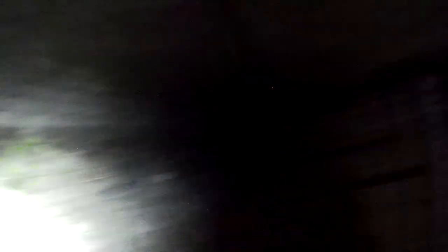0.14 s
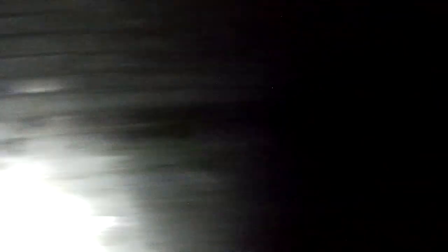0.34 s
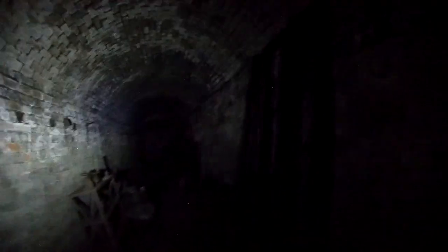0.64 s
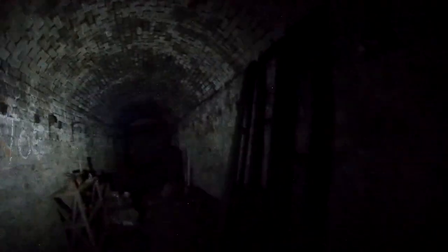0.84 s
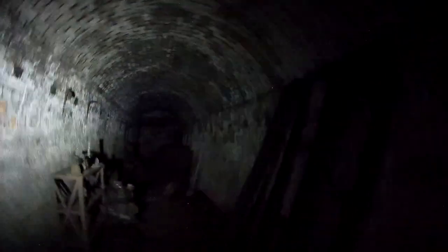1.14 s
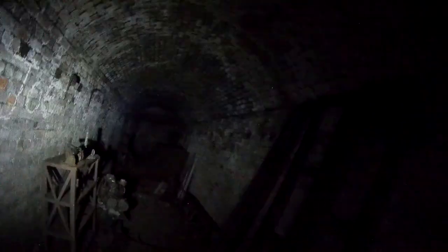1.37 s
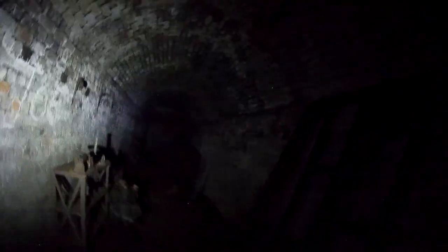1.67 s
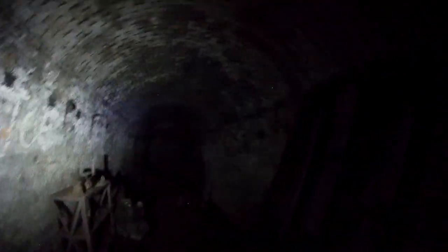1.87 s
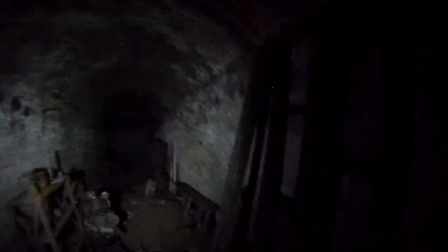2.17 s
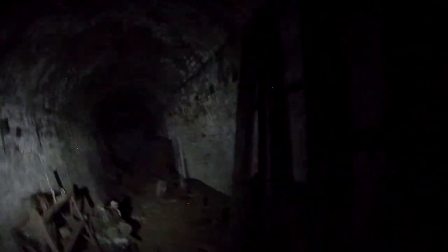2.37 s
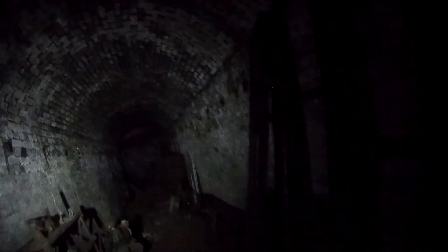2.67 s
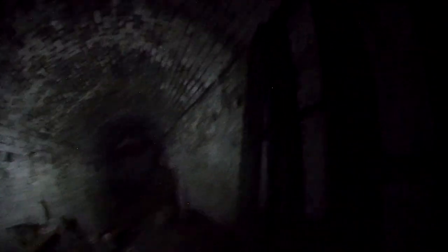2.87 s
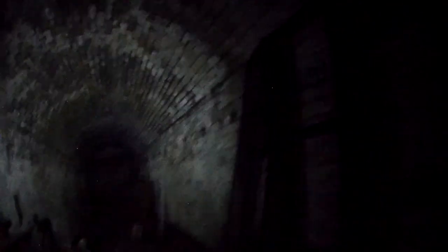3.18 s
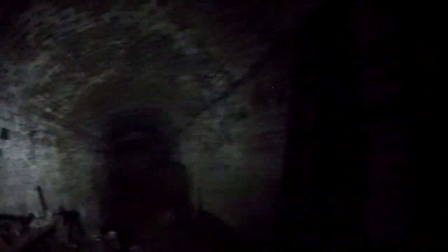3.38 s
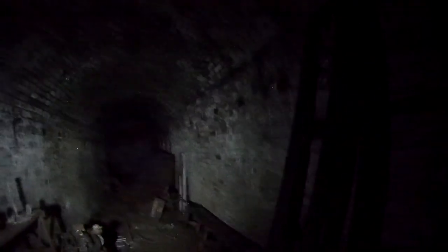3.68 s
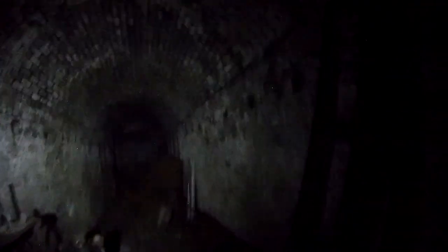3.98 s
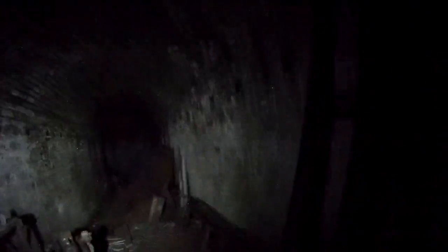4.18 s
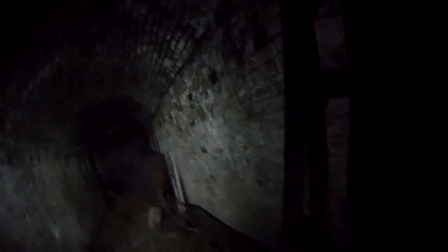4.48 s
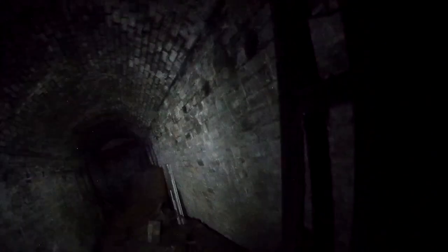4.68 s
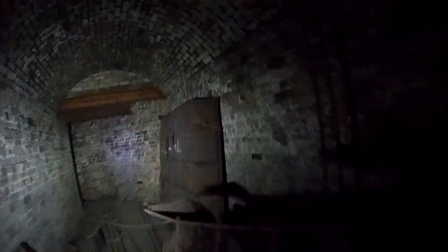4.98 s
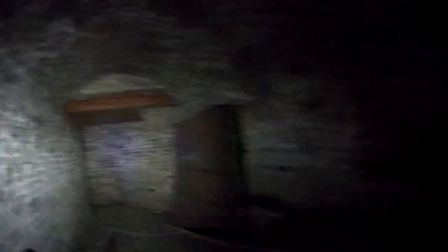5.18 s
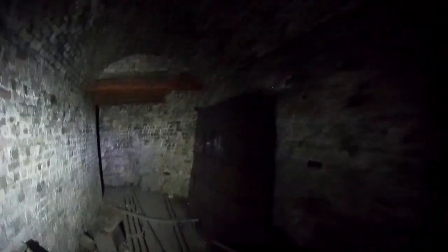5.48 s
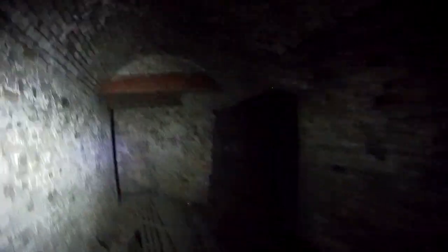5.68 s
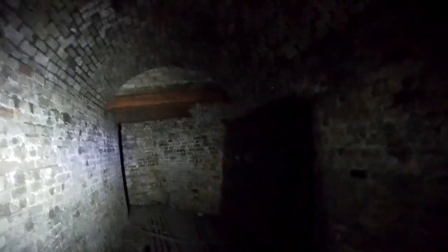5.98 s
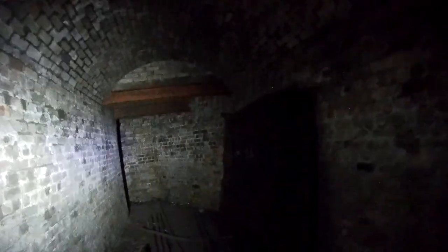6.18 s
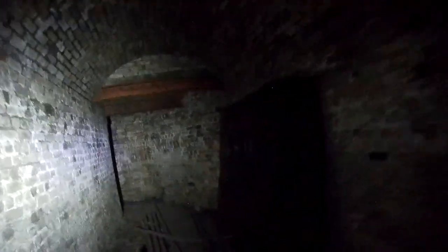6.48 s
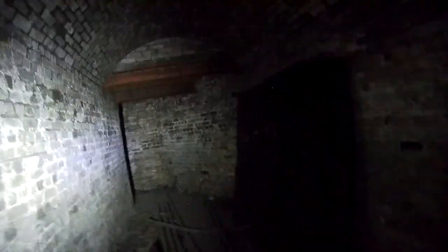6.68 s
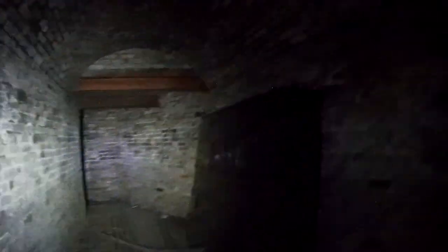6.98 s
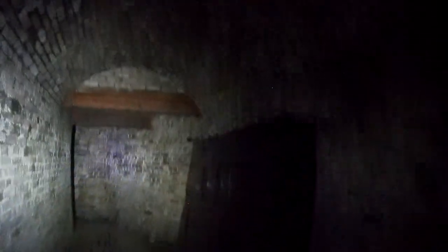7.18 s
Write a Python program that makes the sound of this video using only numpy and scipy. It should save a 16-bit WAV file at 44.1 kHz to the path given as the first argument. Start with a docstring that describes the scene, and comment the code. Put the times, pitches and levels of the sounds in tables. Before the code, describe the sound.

Someone walks unevenly over gritty rubble inside a reverberant brick tunnel. A cluster of crunching steps comes first, then a pause, then denser, louder stomps with sandy scrapes and a sharp stone crack. After a quiet gap a deep thud booms along the vault, followed by faint scuffs. Small debris clinks. A hand-held camera microphone adds dry handling ticks, low rumble and soft hiss.

```python
"""Steps over rubble in a brick tunnel

Contacts are gritty noise pulses, filtered as heel thump, sole slap and knock of the piece underfoot.
Soles scrape as filtered grain noise; loose debris clinks as decaying, phase-rattled sines.
Noise tails make the vault ring after each of these; a late thud swells into a low boom of drifting sines.
Short dry ticks and snaps (the hand-held camera's body, and a cracking stone at 3.57 s) are noise bursts
with a low bump, over steady low rumble, hiss and a thin whine."""
import sys
import numpy as np
from scipy import signal
from scipy.fft import rfft, irfft
from scipy.io import wavfile
from scipy.ndimage import uniform_filter1d, map_coordinates

SR = 44100
rng = np.random.default_rng(int(sys.argv[2]) if len(sys.argv) > 2 else 0)


def int16_out(signal):
    """Quantize to a 16-bit WAV file."""
    q = np.round(np.clip(np.atleast_2d(signal).T, -1, 1) * 32767)
    wavfile.write(sys.argv[1], SR, q.astype(np.int16))


N = 323694

# shoe contacts: t/s, base level/dB, heel bass weight/dB, slap level re base/dB, knock f/Hz
CONTACTS = [(0.496, -31, -11, -6.5, 1266), (0.699, -27, -18.5, -17, 977), (0.793, -26.5, -8, -36, 472),
            (0.852, -18, -20, -23, 484), (0.874, -13, -19.5, -21, 534), (0.924, -17.5, -13, -18.5, 548),
            (0.982, -24.5, -11, -37, 697), (1.045, -22.5, -19, -31, 396), (1.074, -27.5, -11, -12, 440),
            (1.867, -14.5, -15.5, -21.5, 316), (1.962, -16, -18.5, -22.5, 318),
            (2.003, -21, -18, -14.5, 439), (2.218, -23, -25, -28, 791), (2.667, -16.5, -14, -29, 572),
            (2.708, -22, -13, -12, 440), (2.802, -29.5, -17, -2, 1213), (2.824, -28, -7, -11.5, 322),
            (2.913, -15, -14.5, -23, 573), (3.003, -18.5, -14.5, -25, 343), (3.018, -22.5, -19, -19, 396),
            (3.099, -19, -16, -9, 870), (3.112, -16, -22.5, -12, 720), (3.189, -17.5, -10, -43, 704),
            (3.263, -13, -17.5, -19, 708), (3.46, -10.5, -16.5, -13, 726), (3.49, -9.5, -14.5, -18, 283),
            (3.51, -12, -17.5, -37, 785), (3.982, -31, -10, -32, 415), (4.208, -16.5, -23, -21, 706),
            (4.261, -6.5, -14.5, -27, 473), (4.298, -10, -20, -24, 417), (4.335, -9, -19.5, -14.5, 564),
            (5.035, -35.5, -9, -37, 383), (5.142, -34.5, -24, -19, 630), (5.304, -33.5, -21, -14, 751),
            (5.34, -33.5, -23, -15, 1430), (5.634, -29.5, -6, -24, 388), (5.666, -20.5, -2.5, -17, 315),
            (5.682, -21.5, 1, -41, 375), (6.378, -35.5, -22, -13, 560), (6.418, -32, -22, -14.5, 636),
            (6.507, -26, -17, -17.5, 490), (6.569, -31.5, -13, -11.5, 1280), (6.628, -33.5, -12, -26, 480)]
# soles sliding on grit: t/s, base level/dB
SLIDES = [(0.699, -48.5), (0.876, -49), (0.9223, -44), (1.064, -45.5), (1.867, -46), (1.9605, -43),
          (2.6697, -52), (2.9077, -44.5), (3.112, -30), (3.457, -33.5), (3.4943, -32), (4.2599, -32.5),
          (4.3402, -40), (5.3064, -48), (5.347, -48), (5.6403, -43), (5.671, -47), (6.414, -51.5),
          (6.5654, -50)]
# short dry ticks and snaps, camera body and a cracking stone at 3.57 s: t/s, snap peak level/dB
TICKS = [(0.3353, -35), (0.392, -31), (1.1942, -23.5), (1.5129, -41.5), (3.5748, -18.5), (3.7369, -37)]
# loose debris ringing: t/s, f/Hz, level/dB, t60/s
DEBRIS = [(.51, 767, -42, 0.4), (.503, 1260, -37, 0.12), (2.218, 846, -39, .1), (4.22, 1150, -26, 0.15),
          (5.143, 625, -36.5, 0.18), (5.158, 1960, -44, 0.26), (5.162, 3600, -49.5, 0.064),
          (5.346, 1470, -41.5, 0.25), (5.368, 1452, -34.5, 0.089), (5.451, 1990, -44.5, .07),
          (5.46, 3480, -57, .12), (6.833, 656, -32, 0.035)]
# low cross modes of the vault: f/Hz, phase drift rate/Hz, base level/dB, swell/s, t60/s
BOOM_MODES = [(76, 11, -37, 0.015, 0.46), (122.5, 3, -33.5, 0.22, 0.94), (152, 24, -34.5, 0.042, 2.08),
              (184.7, 15.33, -35, 0.037, 1.84), (240, 79, -32.5, 0.032, 0.97), (320, 33, -41, 0.033, 0.68),
              (399, 50, -27, 0.0086, 0.26)]
# spectrum common to heel and sole: f/Hz, gain/dB
SHOE_SPECTRUM = [(60, -59.5), (105, -19), (150, -5.5), (205, -9.5), (265, -4), (430, 2.5), (750, -0.5),
                 (1100, -6), (1700, -15.5), (2200, -17.5), (2800, -32.5), (4000, -33.5), (9000, -59.5)]
# extra heel spectrum, soft heel damps the treble: f/Hz, gain/dB
HEEL_SPECTRUM = [(150, -2), (280, -0.5), (700, 0.5), (1000, -1.5), (1600, -7.5)]
# extra flat-sole spectrum, mostly treble: f/Hz, gain/dB
SLAP_SPECTRUM = [(400, -26), (800, -6.5), (1500, 4.5), (1900, 0), (2300, -2.5), (3100, 0.5), (4000, -2.5)]
# reach of the heel bass weight: f/Hz, share/1
THUMP_REACH = [(130, 0.34), (300, 0.88), (700, 0)]
# sand under a sliding sole: f/Hz, gain/dB
GRIT_SPECTRUM = [(400, -39), (1200, 9.5), (2500, -1), (4000, 0), (6500, -8.5), (8500, -15.5),
                 (15000, -21.5)]
# spectrum shared by ticks and snaps: f/Hz, gain/dB
SNAP_SPECTRUM = [(100, 9), (300, 8), (1400, 1), (1800, 9), (3000, 5.5), (4300, -10.5), (5200, -13),
                 (7500, -19.5), (15000, -46)]
# vault resonances: f/Hz, width/Hz, lift/dB
VAULT_RESONANCES = [(269.8, 6.8, 6.5), (306.7, 31, 7), (397.6, 6.1, 6), (582, 18, 0.5), (764, 14, 2.5),
                    (1120, 18, -4)]
# vault reverberation: f/Hz, t60/s
VAULT_DECAY = [(120, 1.6), (260, 0.78), (700, 0.69), (1200, 0.62), (2000, 0.5), (4800, 0.42), (12000, 0.2)]
# background spectrum, relative: f/Hz, density/dB per Hz
FLOOR_SPECTRUM = [(20, -3), (54, -2), (100, -5.5), (125, -12), (170, -6.5), (240, -11), (330, -15.5),
                  (450, -16), (750, -19.5), (1200, -23), (2000, -26.5), (5000, -30), (15500, -31)]

T = np.arange(SR) / SR  # s, span of one event
HZ = np.fft.rfftfreq(2 * SR, 1 / SR)
HEEL_DB, SLAP_DB = -13.5, -4.5  # offsets to each part's 40 ms rms level
USUAL_THUMP_DB = -17  # bass weight that leaves the heel spectrum unchanged
KNOCK_DB, KNOCK_HALF_WIDTH_RATIO = 9, 0.033
RISE_S, HEEL_PRESS_S, SLAP_PRESS_S = 0.0012, 0.016, 0.017  # base press, before linger
FIRM_DB, PRESS_DOUBLES_DB = -22, 40  # press doubles per 40 dB; no change at -22 dB
ROLL_S, ROLL_LINGER, ROLL_ECHO_DB = 0.077, 0.54, -6  # foot already down: longer press, less echo
HEEL_ECHO_DB, SLAP_ECHO_DB, ECHO_BUILD_S = -2, -2, 0.0038  # echo of a fresh landing
SETTLE_S, SETTLE_DB, SETTLE_LOSS_DB = 0.04, -14.5, 5  # mean gap, first shift, loss per shift
SLIDE_S, SCRAPE_DB = 0.046, -8  # time scale, offset to 40 ms rms level
RASP_RAD, RASP_S = 0.54, 0.024
THUD_S, BOOM_DB = 5.68, -2
BUMP_DB = -15.5  # re snap peak
FLOOR_DB, WHINE_HZ, WHINE_DB = -53, 14126, -90  # rms levels
TOP_HZ = 15800


def steps():
    """Heel thumps, flat sole slaps, piece underfoot knocks at its own pitch."""
    out = np.zeros(N)
    body_db = along(SHOE_SPECTRUM, HZ)
    for hz, width_hz, lift_db in VAULT_RESONANCES:
        body_db = body_db + lift_db / (1 + (2 * (HZ - hz) / width_hz) ** 2)
    heel_body_db = body_db + along(HEEL_SPECTRUM, HZ)
    slap_body_db = body_db + along(SLAP_SPECTRUM, HZ)
    bass_share = along(THUMP_REACH, HZ)
    gaps_s = np.diff([row[0] for row in CONTACTS], prepend=0)
    for (s, db, thump_db, slap_db, knock_hz), gap_s in zip(CONTACTS, gaps_s):
        rolling = np.exp(-(gap_s / ROLL_S) ** 2)  # near 0: fresh landing; near 1: foot still down
        # louder contacts press longer
        linger = (1 + ROLL_LINGER * rolling) * 2 ** ((db - FIRM_DB) / PRESS_DOUBLES_DB)
        roll_echo_db = ROLL_ECHO_DB * rolling
        weight_db = bass_share * (thump_db - USUAL_THUMP_DB)
        knock_db = KNOCK_DB / (1 + ((HZ / knock_hz - 1) / KNOCK_HALF_WIDTH_RATIO) ** 2)

        heel = tunnel(crunch(HEEL_PRESS_S * linger), HEEL_ECHO_DB + roll_echo_db, ECHO_BUILD_S)
        heel = coloured(heel, heel_body_db + weight_db + knock_db)
        add(out, s, at_level(heel, db + HEEL_DB))

        slap = tunnel(crunch(SLAP_PRESS_S * linger), SLAP_ECHO_DB + roll_echo_db, ECHO_BUILD_S)
        slap = coloured(slap, slap_body_db + knock_db)
        add(out, s, at_level(slap, db + slap_db + SLAP_DB))
    return out


def crunch(press_s):
    """Contact force: a gritty press, then three ever weaker shifts of the rubble."""
    gaps_s = SETTLE_S * rng.uniform(0.5, 1.5, size=3)
    shifts = [(0, 0)]
    for k, s in enumerate(np.cumsum(gaps_s)):
        shifts.append((s, SETTLE_DB - SETTLE_LOSS_DB * k))
    pressure = np.zeros(SR)
    for s, db in shifts:
        t = np.maximum(T - s, 0)
        pressure += amp(db) * (1 - np.exp(-t / RISE_S)) * np.exp(-(t / press_s) ** 2)
    return grains(spread_db=2.5) * pressure


def scrapes():
    """Sand grinds under a sliding sole: grain noise swells, then decays."""
    out = np.zeros(N)
    u = T / SLIDE_S
    for s, db in SLIDES:
        slide = grains(spread_db=4) * np.sqrt(u) * np.exp(-3.5 * u)
        ringing = tunnel(slide, wet_db=-2.5, build_s=0.0027)
        add(out, s, at_level(coloured(ringing, along(GRIT_SPECTRUM, HZ)), db + SCRAPE_DB))
    return out


def clinks():
    """Nudged debris rings as a decaying sine; phase noise gives rattle and an initial rasp."""
    out = np.zeros(N)
    for s, hz, db, t60_s in DEBRIS:
        rattle = map_coordinates(rng.standard_normal(154), [150 * T])
        rasp = map_coordinates(rng.standard_normal(604), [600 * T])
        rasp = RASP_RAD * np.exp(-T / RASP_S) * rasp
        envelope = amp(db - 60 * T / t60_s) * (1 - np.exp(-T / 0.001))
        ring = np.sin(2 * np.pi * hz * T + rattle + rasp) * envelope
        add(out, s, tunnel(ring, wet_db=-13, build_s=0.0082))
    return out


def boom():
    """Vault cross modes after the thud, each with its own swell and decay."""
    out = np.zeros(N)
    for hz, drift_hz, db, swell_s, t60_s in BOOM_MODES:
        # many paths of unequal length smear the phase: smoothed random walk
        drift = np.cumsum(rng.standard_normal(SR)) * np.sqrt(np.pi * drift_hz / SR)
        ring = np.sin(2 * np.pi * hz * T + uniform_filter1d(drift, size=600))
        swell = np.minimum(T / swell_s, 1) ** 2
        decay = amp(-60 * np.maximum(T - swell_s, 0) / t60_s)
        add(out, THUD_S, amp(db + BOOM_DB) * ring * swell * decay)
    return out


def ticks():
    """Short dry ticks and snaps: a filtered noise burst plus a soft 110 Hz bump."""
    out = np.zeros(N)
    for s, db in TICKS:
        snap = rng.standard_normal(SR) * T * np.exp(-T / 0.0007)
        snap = coloured(snap, along(SNAP_SPECTRUM, HZ))
        bump = amp(BUMP_DB) * np.sin(2 * np.pi * 110 * T) * np.exp(-T / 0.0077)
        add(out, s, amp(db) * (snap / np.abs(snap).max() + bump))
    return out


def floor():
    """Low rumble and microphone hiss as shaped noise; electronic whine as a sine."""
    hz = np.fft.rfftfreq(N, 1 / SR)
    spectrum = rfft(rng.standard_normal(N)) * amp(along(FLOOR_SPECTRUM, hz))
    hiss = unit(irfft(spectrum, N))
    whine = unit(np.sin(2 * np.pi * WHINE_HZ * np.arange(N) / SR))
    return amp(FLOOR_DB) * hiss + amp(WHINE_DB) * whine


def tunnel(x, wet_db, build_s):
    """Direct sound plus the vault's answer: a fresh noise tail, decay set per frequency."""
    hz, t, z = signal.stft(rng.standard_normal(SR), SR, nperseg=256)
    decay = amp(-60 * t / along(VAULT_DECAY, hz)[:, None])
    tail = signal.istft(z * decay, SR, nperseg=256)[1][:SR]
    tail = tail * (1 - np.exp(-T / build_s))
    tail = tail / np.linalg.norm(tail)
    return x + amp(wet_db) * signal.fftconvolve(x, tail)[:SR]


def grains(spread_db):
    """Noise of tiny fractures, size varying at random each half millisecond."""
    size_db = spread_db * np.interp(T, np.linspace(0, 1, 2000), rng.standard_normal(2000))
    return unit(rng.standard_normal(SR) * amp(size_db))


def coloured(x, gain_db):
    """Minimum-phase filter with the given gain on the HZ grid."""
    cepstrum = irfft(np.log(amp(gain_db)))
    # fold onto positive time: causal
    cepstrum[1:SR] *= 2
    cepstrum[SR + 1:] = 0
    response = np.exp(rfft(cepstrum))
    return irfft(rfft(x, 2 * SR) * response)[:SR]


def at_level(x, db):
    """Scale so that the first 40 ms have the given rms level."""
    return amp(db) * x / np.sqrt(np.mean(x[T < 0.04] ** 2))


def along(points, hz):
    """Interpolate (f/Hz, value) points on a log-frequency axis."""
    f, v = np.transpose(points)
    return np.interp(np.log(hz + 1), np.log(f + 1), v)


def add(track, s, sound):
    """Mix a sound into the track from time s."""
    start = round(s * SR)
    track[start:start + len(sound)] += sound[:N - start]


def amp(db):
    """dB to amplitude ratio."""
    return 10 ** (np.asarray(db) / 20)


def unit(x):
    """Scale to unit rms."""
    return x / np.sqrt(np.mean(x ** 2) + 1e-20)


def scene():
    """Sum of all sources at one microphone."""
    return (steps() + scrapes() + clinks() + boom() + ticks() + floor())[None]


def record(dry):
    """The camera keeps nothing at or above its band limit."""
    return irfft(rfft(dry) * (np.fft.rfftfreq(N, 1 / SR) < TOP_HZ), N)


dry = scene()
out = record(dry)
int16_out(out)
```